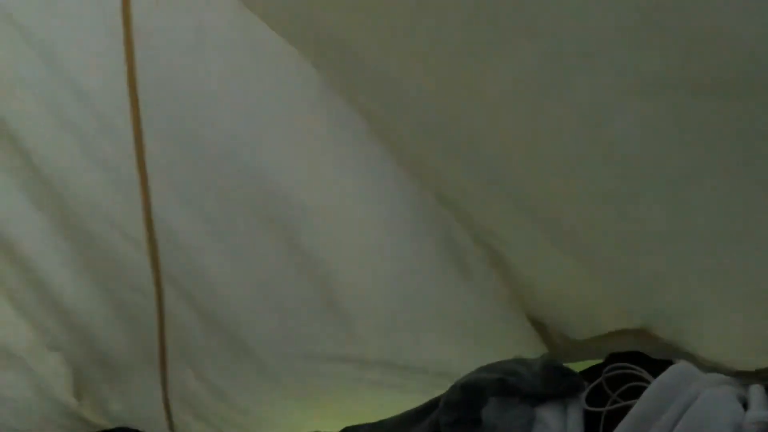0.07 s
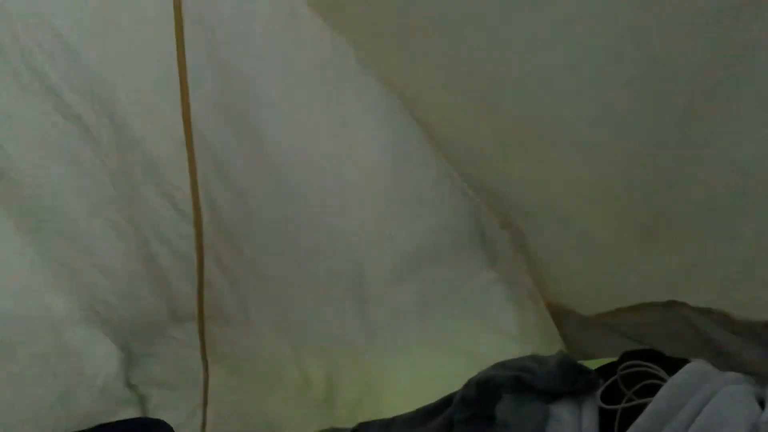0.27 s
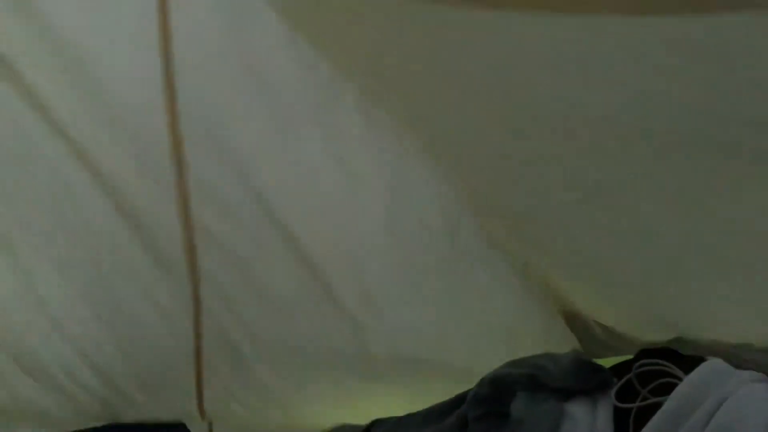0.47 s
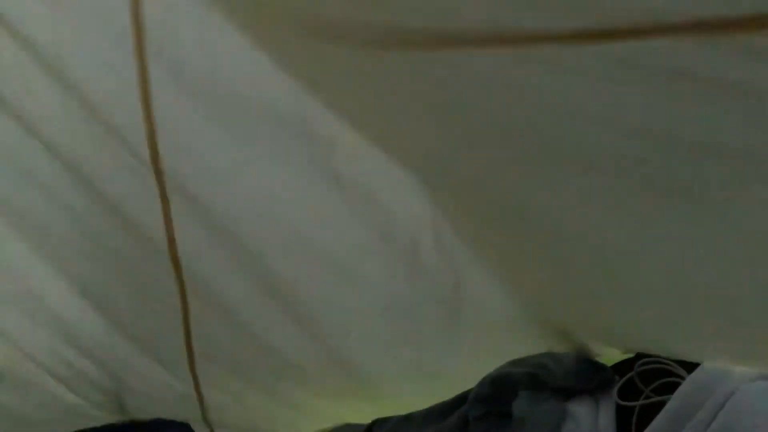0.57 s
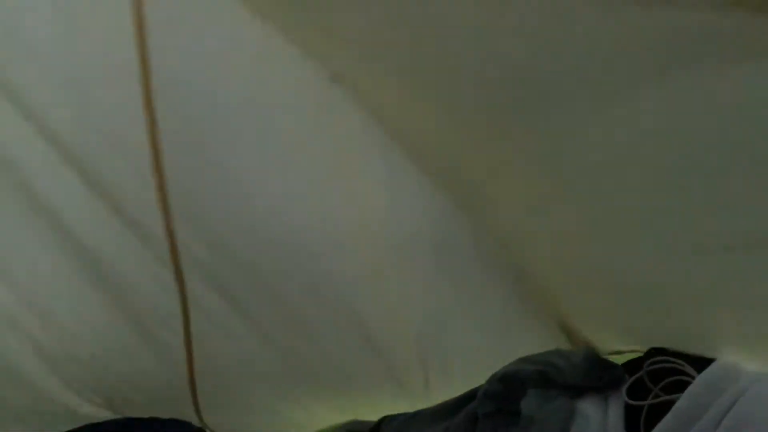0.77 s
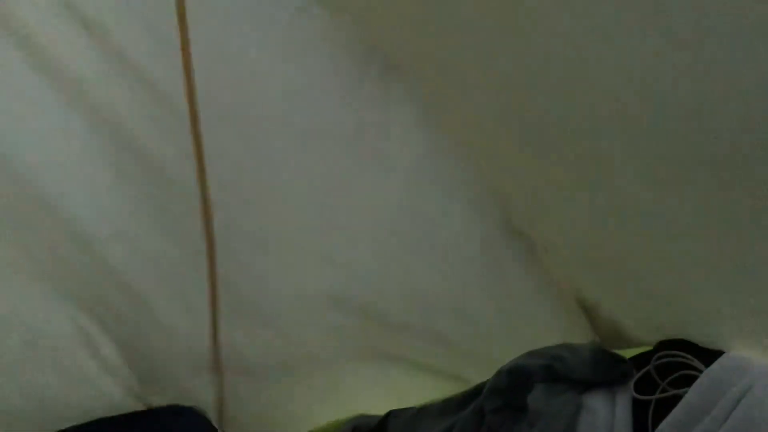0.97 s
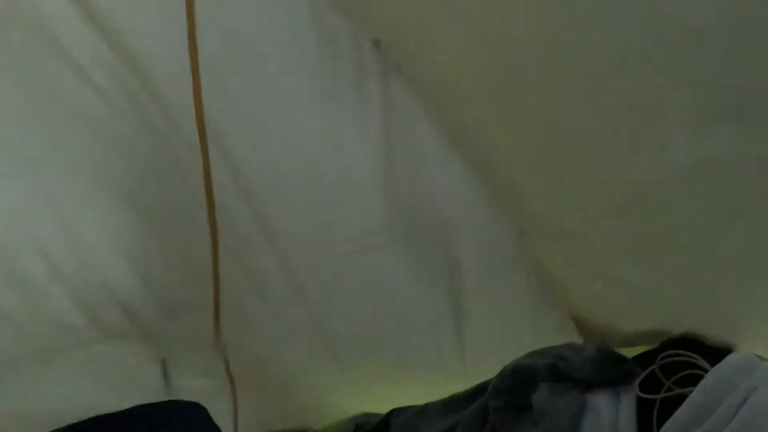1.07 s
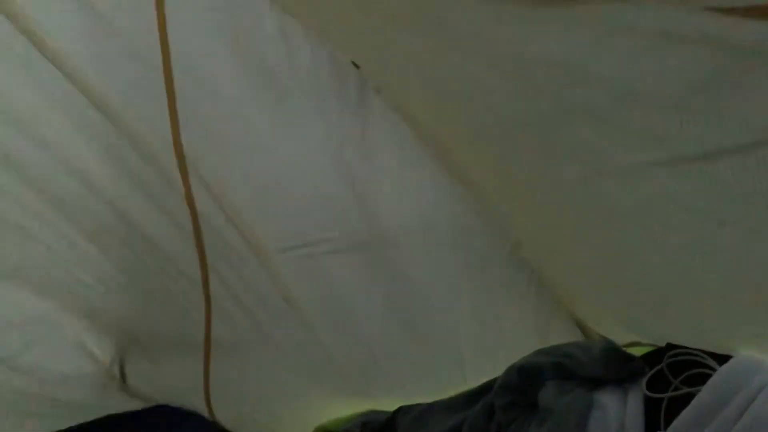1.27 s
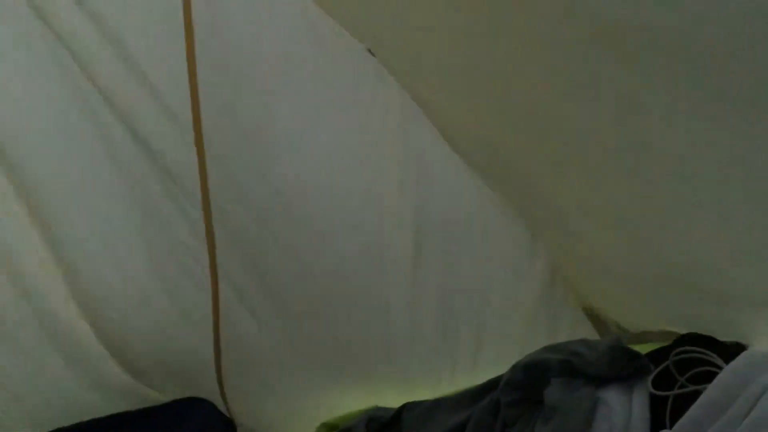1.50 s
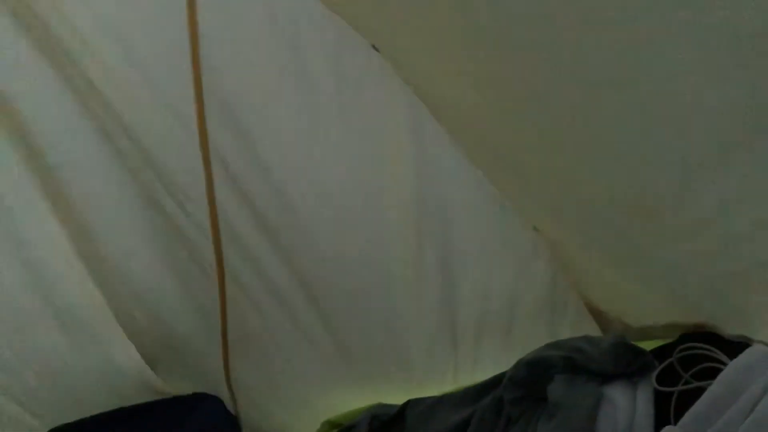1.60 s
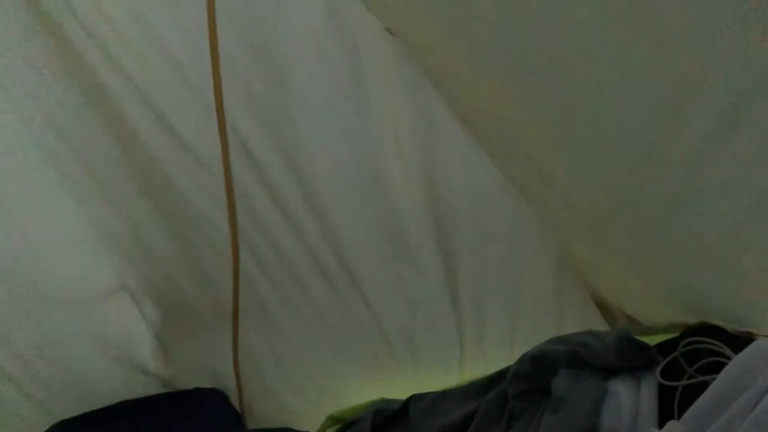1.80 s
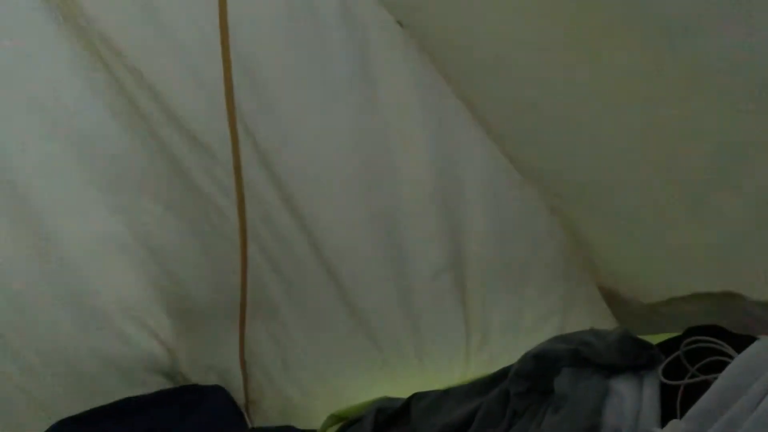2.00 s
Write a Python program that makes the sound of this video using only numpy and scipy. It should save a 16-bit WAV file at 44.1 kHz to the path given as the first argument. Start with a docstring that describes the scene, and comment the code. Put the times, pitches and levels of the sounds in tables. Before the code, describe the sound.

Tent walls rustle, snap and thump as wind gusts rumble outside the shelter.

```python
"""Inside a tent in gusty wind. The air rumbles outside; the walls flutter, crinkle and hiss as they slide.
At 0.2 s a crease snaps and a panel thumps taut. A first gust swells to 0.6 s, buckling folds in short
crackling flaps and bringing a faint high jingle. At one second the hardest gust hits: sharp crackle,
the heaviest thumps, a swish and a low whump. The wind then eases, with a last flurry around 1.8 s."""
import sys
import numpy as np
from scipy import signal
from scipy.fft import rfft, irfft, next_fast_len
from scipy.io import wavfile
from scipy.ndimage import map_coordinates

SR = 44100
rng = np.random.default_rng(int(sys.argv[2]) if len(sys.argv) > 2 else 0)


def master_out(mix):
    """Clip the mix to full scale and print it as 16-bit PCM to the path in sys.argv[1]."""
    frames = np.transpose(np.atleast_2d(mix))
    ceiling = np.clip(frames, -1, 1)
    pcm = np.round(ceiling * 32767).astype(np.int16)
    wavfile.write(sys.argv[1], SR, pcm)


N = 90404


def amp(db):
    """Decibels to gain."""
    return 10 ** (np.asarray(db) / 20)


def unit(x):
    """Scale to rms 1."""
    return x / np.sqrt(np.mean(x ** 2) + 1e-20)


def curve(rows):
    """One value per sample from (s, value) rows."""
    return np.interp(np.arange(N) / SR, *np.transpose(rows))


def wobble(rate):
    """A smooth random curve, rate knots a second."""
    return map_coordinates(rng.standard_normal(2048), [np.arange(N) * rate / SR], mode="wrap")


def filtered(x, response):
    """x times a response of frequency."""
    m = next_fast_len(len(x) + 8192)
    return irfft(rfft(x, m) * response(np.fft.rfftfreq(m, 1 / SR)), m)[:len(x)]


def coloured(x, spectrum):
    """x shaped by (Hz, dB) points, at rms 1."""
    f, db = np.transpose(spectrum)
    return unit(filtered(x, lambda hz: amp(np.interp(np.log(hz + 1), np.log(f), db))))


def ticks(rate, spread_db, bed_db, size=N):
    """Tiny buckles at random times and of uneven strength, over a bed of countless smaller ones."""
    hit = rng.random(size) < rate / SR
    strength = amp(spread_db * np.minimum(rng.exponential(size=size), 3))
    return unit(unit(hit * strength * rng.choice([-1, 1], size)) + amp(bed_db) * rng.standard_normal(size))


def add(track, s, sound):
    """Mix a sound into the track at time s."""
    part = track[max(round(s * SR), 0):][:len(sound)]
    part += sound[:len(part)]


def swing(hz, waver=0.041, waver_hz=100.3):
    """A panel swinging at a pitch that wavers with its tension."""
    pitch = hz * np.exp(waver * wobble(waver_hz))
    return np.sin(2 * np.pi * np.cumsum(pitch) / SR)


def tent(x, t60_s=0.02, send_db=-8):
    """The small soft space adds a very short tail."""
    t = np.arange(4096) / SR
    tail = rng.standard_normal(len(t)) * np.exp(-np.log(1000) * t / t60_s)
    return x + amp(send_db) * signal.fftconvolve(x, tail / np.linalg.norm(tail))[:N]


# fader ride of the gusts, before trim: t/s, level/dB
WIND_RIDE = [(0, -30.5), (.05, -36.5), (.35, -33.5), (.6, -26.5), (.83, -32.5), (.94, -31.5), (1.02, -22),
             (1.1, -27), (1.3, -26.5), (1.47, -31), (1.52, -37.5), (1.8, -34.5), (2.05, -39)]
# EQ of the rumble: f/Hz, level/dB
WIND_EQ = [(15, -52), (30, -20), (45, -5), (61, -7), (82, -5.5), (125, -6), (170, -5.5), (250, -11.5),
           (500, -23), (1200, -90)]

def wind(trim_db=-1.5):
    """Low rumble of the gusts pressing on the tent."""
    return amp(curve(WIND_RIDE) + trim_db) * coloured(rng.standard_normal(N), WIND_EQ)


# jingle cues: t/s, level/dB
JINGLE_CUES = [(.483, -44), (.502, -45), (.56, -46), (.72, -53), (1.16, -47), (1.215, -47), (1.29, -52),
               (1.333, -49), (1.385, -49), (1.735, -49)]
# resonances of the metal: f/Hz, level/dB
METAL_MODES = [(12830, 1), (13770, -9)]

def jingles(half_width_hz=82, length_s=0.033):
    """A faint, very high jingle, perhaps a zip pull shaken by the wall."""
    out, t = np.zeros(N), np.arange(4096) / SR
    ring = lambda f: sum(amp(db) / (1 + ((f - hz) / half_width_hz) ** 2) for hz, db in METAL_MODES)
    envelope = np.sin(np.pi * np.minimum(t / length_s, 1))
    for s, db in JINGLE_CUES:
        add(out, s, amp(db) * unit(filtered(rng.standard_normal(len(t)), ring)) * envelope)
    return out


# fader ride of cloth sliding on cloth: t/s, level/dB
SLIDE_RIDE = [(0, -50.5), (.29, -48.5), (.48, -43), (.53, -40), (.64, -37.5), (.70, -41), (.89, -40),
              (1.0, -34.5), (1.13, -34), (1.25, -44.5), (1.46, -41), (1.52, -49), (1.73, -42.5),
              (1.87, -51), (2.05, -53.5)]
# quick slips: peak t/s, level/dB, half length/s
SLIP_CUES = [(0.118, -49, 0.0047), (.186, -46, .008), (0.403, -38.5, 0.0079), (1.031, -29, 0.028),
             (1.216, -36, .006), (1.298, -33.5, 0.0083), (1.398, -39, 0.013), (1.602, -45, 0.024),
             (1.818, -37, 0.01)]
# EQ of the airy hiss: f/Hz, level/dB
SWISH_EQ = [(1500, 4), (4500, -1), (7500, 1), (11000, 0.5), (14000, -1), (16000, -1)]

def swish():
    """The weave hisses as one layer slides over the other, flaring with each quick slip."""
    t = np.arange(N) / SR
    slide_power = amp(curve(SLIDE_RIDE)) ** 2
    slip_power = sum(amp(db) ** 2 * np.exp(-((t - s) / half) ** 2) for s, db, half in SLIP_CUES)
    threads = ticks(rate=5300, spread_db=4, bed_db=6.0) * amp(1.44 * wobble(88.66))
    return np.sqrt(slide_power + slip_power) * coloured(threads, SWISH_EQ)


# fader ride of the creasing cloth, before trim: t/s, level/dB
CRINKLE_RIDE = [(0, -47), (.30, -47.5), (.42, -42), (.62, -39.5), (.88, -51.5), (.95, -36.5), (.985, -27.5),
                (1.07, -46), (1.33, -46.5), (1.55, -47.5), (1.85, -46), (2.05, -53)]
# EQ of the crisp ticks: f/Hz, level/dB
CRINKLE_EQ = [(600, 9.5), (1900, 6), (3100, 1), (4100, 1.5), (6500, -2.5), (10000, -23), (16000, -43)]

def crinkle(trim_db=1.5):
    """Small creases tick in clumps."""
    creases = ticks(rate=1100, spread_db=3.5, bed_db=-7) * amp(1.5 * wobble(110))
    return amp(curve(CRINKLE_RIDE) + trim_db) * coloured(creases, CRINKLE_EQ)


# fader ride of the fluttering walls, before trim: t/s, level/dB
FLUTTER_RIDE = [(0, -46.5), (.17, -39.5), (.37, -34.5), (.41, -31), (.73, -30.5), (.87, -40), (.95, -30),
                (.985, -26), (1.02, -30), (1.31, -30), (1.38, -32.5), (1.60, -44.5), (1.80, -34),
                (1.97, -44.5), (2.05, -38)]
# EQ of the cloth's soft body: f/Hz, level/dB
FLUTTER_EQ = [(30, -39), (90, -0.5), (190, -2.5), (370, 1), (600, -5), (950, -5.5), (1850, -10.5),
              (2600, -19.5), (5000, -28), (15000, -46)]

def flutter(trim_db=0.5):
    """Ripples run through the walls: soft, dense pats that come in quick surges."""
    pats = ticks(rate=1300, spread_db=2.0, bed_db=-4.5) * amp(2.5 * wobble(95))
    return amp(curve(FLUTTER_RIDE) + trim_db) * coloured(pats, FLUTTER_EQ)


# panels billowing: peak t/s, level/dB, half length/s, f/Hz
BILLOW_CUES = [(0.59, -23.5, 0.039, 135), (1.04, -20.5, .04, 60), (1.231, -22, 0.027, 148)]

def billows():
    """A gust fills a panel: a low whump that swells and fades."""
    t = np.arange(N) / SR
    return sum(amp(db) * swing(hz) * np.exp(-((t - s) / half) ** 2) for s, db, half, hz in BILLOW_CUES)


# creases snapping through: t/s, level/dB, f/Hz, t60/s
SNAP_CUES = [(.1975, -28, 1750, 0.038), (1.127, -17.5, 1870, 0.011), (1.499, -30, 1620, 0.03)]

def snaps(q=2.5):
    """A tight crease pops through with a light, papery snap about an octave wide."""
    out, t = np.zeros(N), np.arange(4096) / SR
    for s, db, hz, t60 in SNAP_CUES:
        band = lambda f: 1 / (1 + (q * (f / hz - hz / (f + 1)) / 2) ** 4)
        burst = unit(filtered(rng.standard_normal(len(t)), band))
        add(out, s, amp(db) * burst * np.exp(-np.log(1000) * t / t60))
    return out


# folds buckling, before trim: t/s, level/dB, hold/s, high-cut f/Hz
FLAP_CUES = [(0.104, -40, 0.01, 4800), (0.332, -36.5, 0.0061, 4340), (0.39, -28.5, 0.021, 1800),
             (0.419, -21.5, 0.0041, 1250), (0.44, -27, 0.0043, 1750), (0.511, -31, 0.0038, 4000),
             (0.519, -30, 0.014, 4660), (0.573, -28, 0.0088, 2100), (0.637, -25.5, 0.0086, 2200),
             (0.721, -28, 0.0017, 3700), (0.777, -30, 0.015, 1780), (0.962, -17.5, 0.012, 1850),
             (0.981, -15, 0.0048, 3000), (0.998, -20, 0.0056, 2100), (1.182, -30, 0.02, 2040),
             (1.28, -36.5, 0.04, 3850), (1.322, -22, 0.0056, 1750), (1.328, -28, 0.0087, 2300),
             (1.467, -39, 0.013, 3920), (1.725, -35.5, 0.0099, 4200), (1.744, -31, 0.0043, 4600),
             (1.8035, -27.5, 0.0095, 2600), (1.817, -28.5, 0.006, 3800), (1.996, -38, 0.0042, 4030)]

def flaps(trim_db=-3.5, high_cut_order=2.98, attack_s=0.00045, release_s=0.002, lift_s=0.00098):
    """A fold buckles in a short, even burst of crackle that starts sharply; tight folds are brighter."""
    out, t = np.zeros(N), np.arange(4096) / SR
    mean_db = np.mean([db for s, db, hold, hz in FLAP_CUES])
    attack = 1 - np.exp(-t / attack_s)
    onset_lift = amp(-16) * np.exp(-t / lift_s)
    for s, db, hold, hz in FLAP_CUES:
        low_hz = 0.33 * hz * amp(-0.25 * (db - mean_db))  # harder flaps reach deeper
        band = lambda f: f ** 2 / (f ** 2 + low_hz ** 2) / np.sqrt(1 + (f / hz) ** (2 * high_cut_order))
        run = np.exp(-np.maximum(t - hold, 0) / release_s)
        envelope = attack * (run + onset_lift)
        cracks = envelope * filtered(ticks(rate=2000, spread_db=3.0, bed_db=-3.5, size=len(t)), band)
        add(out, s, amp(db + trim_db) * unit(cracks) * np.sqrt(np.mean(envelope ** 2)))
    return out


# panels pulling taut: t/s, level/dB, f/Hz, t60/s
THUMP_CUES = [(0.2238, -14.5, 283, 0.021), (0.782, -21.5, 268, 0.048), (.964, -13.5, 505, 0.031),
              (.983, -12.5, 300, 0.037), (0.9968, -8, 385, 0.03), (0.998, -13.5, 126, 0.12),
              (1.198, -19.5, 205, 0.087), (1.462, -22.5, 305, 0.044), (1.753, -20.5, 171, 0.05)]

def thumps(attack_s=0.00059):
    """A panel snaps taut and swings for a few cycles."""
    out, t = np.zeros(N), np.arange(N) / SR
    attack = 1 - np.exp(-t / attack_s)
    for s, db, hz, t60 in THUMP_CUES:
        add(out, s, amp(db) * swing(hz) * attack * np.exp(-np.log(1000) * t / t60))
    return out


def scene():
    """Wind and cloth in mono, heard from inside; only the crackle gets the tent's tail."""
    body = wind() + billows() + thumps() + flutter()
    sheen = swish() + jingles()
    crackle = crinkle() + flaps() + snaps()
    return (body + sheen + tent(crackle))[None]


def record(dry):
    """Master EQ: the deepest bass rolls off and a brick wall cuts the very top."""
    low_cut_hz, top_hz = 46, 15780
    band = lambda hz: (hz < top_hz) * hz ** 4 / np.sqrt(hz ** 8 + low_cut_hz ** 8)
    return np.array([filtered(channel, band) for channel in dry])


dry = scene()
out = record(dry)
master_out(out)
```